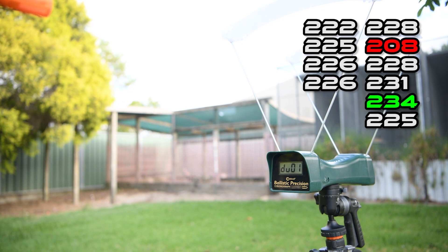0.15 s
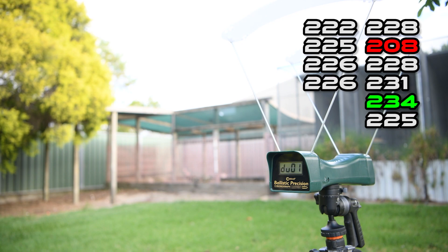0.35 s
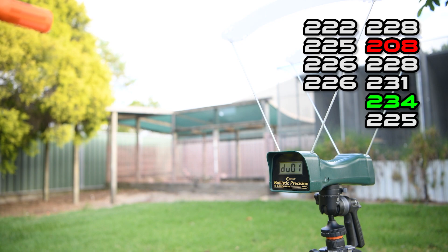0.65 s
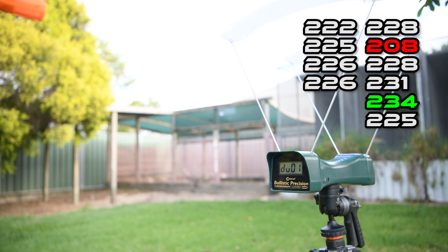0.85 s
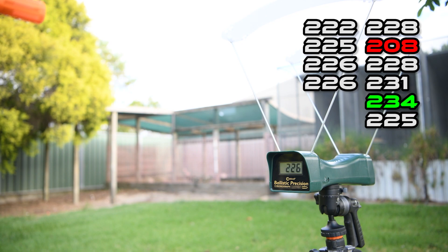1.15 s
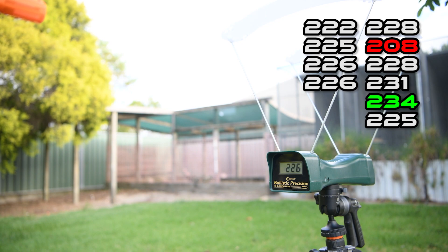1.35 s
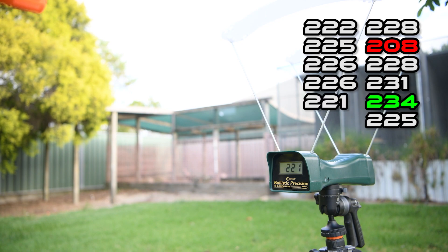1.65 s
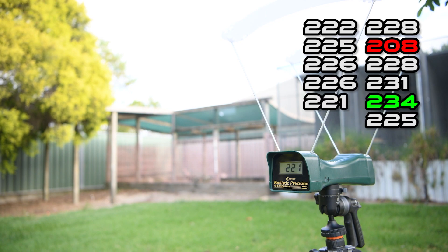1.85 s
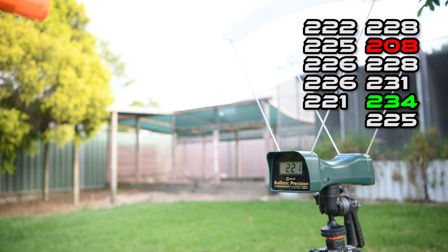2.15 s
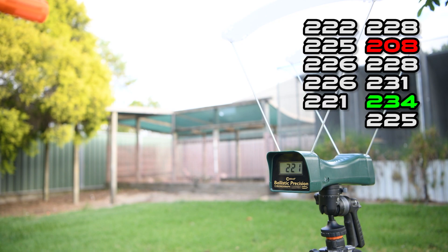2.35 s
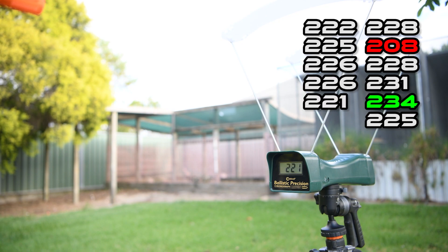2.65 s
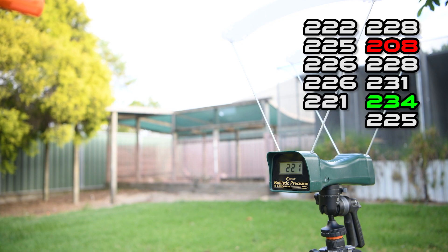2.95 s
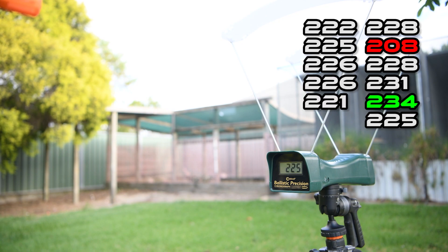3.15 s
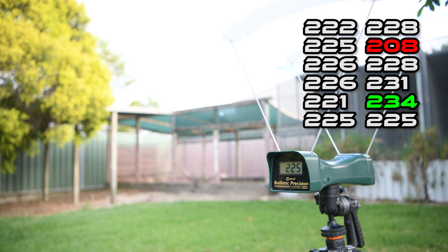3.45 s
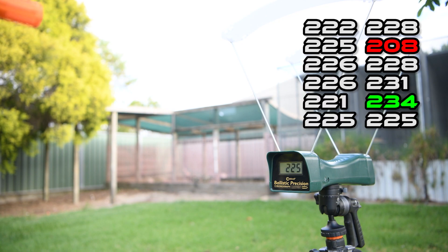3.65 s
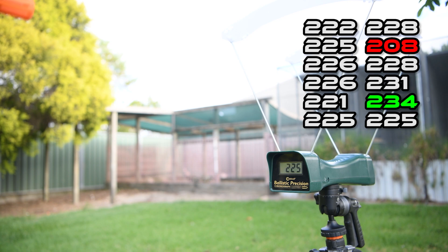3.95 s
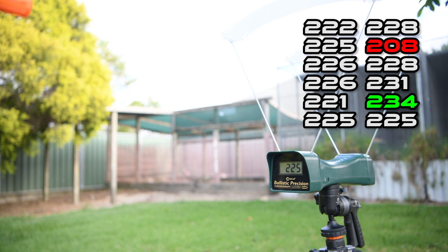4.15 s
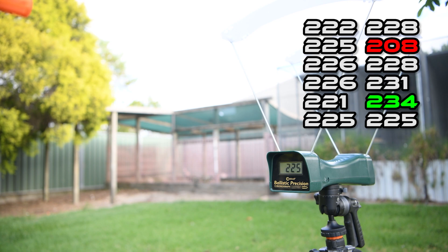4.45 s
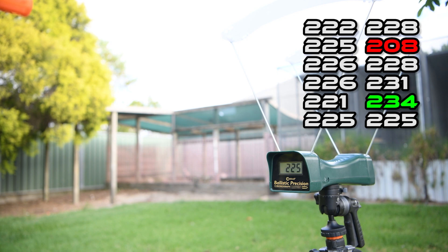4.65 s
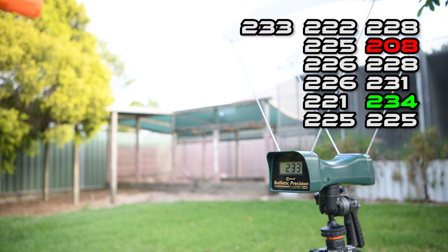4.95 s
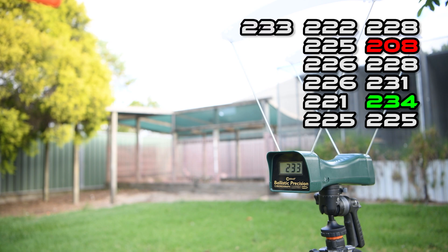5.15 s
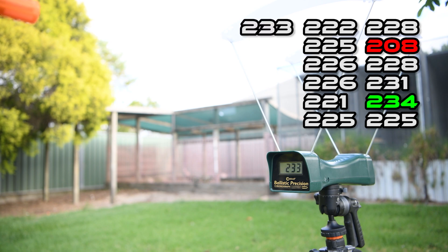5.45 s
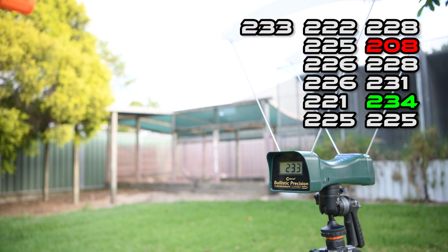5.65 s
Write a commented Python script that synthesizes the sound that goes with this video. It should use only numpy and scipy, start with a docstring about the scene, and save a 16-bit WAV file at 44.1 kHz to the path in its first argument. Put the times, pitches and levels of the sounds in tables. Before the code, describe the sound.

A spring-powered toy dart blaster is fired and re-primed four times outdoors, with sharp cracks, plastic scraping and hard clacks, and faint wind.

```python
"""Fenced garden, stereo microphone close by, a spring dart blaster just to its left, fired and primed four times.
Each shot is a noise crack, a sine thump and a barrel hum, with a rattling shell. Then the slide scrapes back
and forward among knocks: rough slips and blows drive shell resonances and bands of hiss.
Low noise puffs of wind hit mostly the right port over shaped noise of far traffic and a narrow far drone.
A small bird chirps in gliding sines; blaster and bird return scattered noise echoes from fences and sheds."""
import sys
import numpy as np
from scipy import signal
from scipy.fft import rfft, irfft
from scipy.io import wavfile
from scipy.ndimage import uniform_filter1d

SR = 44100
rng = np.random.default_rng(int(sys.argv[2]) if len(sys.argv) > 2 else 0)


def generate_wav(sig):
    """Save sig (samples, or channels by samples) to the path in sys.argv[1] as 16-bit PCM at SR."""
    pcm = np.round(np.clip(np.atleast_2d(sig).T, -1, 1) * 32767).astype(np.int16)
    wavfile.write(sys.argv[1], SR, pcm)


N = 255780
T = np.arange(N) / SR


def undb(db):
    """Gain of a level in dB."""
    return 10 ** (np.asarray(db) / 20)


def ring(x, hz, width_hz):
    """One resonance, gain 1 at its centre."""
    return signal.lfilter(*signal.iirpeak(hz, hz / width_hz, fs=SR), x)


def unit(x):
    """Scaled to rms 1."""
    return x / np.sqrt(np.mean(x ** 2))


def add(track, s, x):
    """Mixes x into the track from time s on."""
    i = int(s * SR)
    track[..., i:i + x.shape[-1]] += x[..., :N - i]


def grit(scatter_db, alike, ticks_hz, tick_db):
    """Dense tiny slips of uneven size with sparse harder ticks, one row per port, partly shared."""
    slips = rng.standard_normal((2, N)) * undb(scatter_db * rng.exponential(size=(2, N)))
    right = alike * slips[0] + np.sqrt(1 - alike ** 2) * slips[1]
    hits = (rng.random(N) < ticks_hz / SR) * undb(tick_db + rng.standard_normal(N))
    catch = 1 + signal.lfilter([1], [1, -.97], hits)  # a tick lasts about a millisecond
    return unit(catch * np.array([slips[0], right]))


def flutter(rate, depth_db):
    """Gain that wavers at random about rate times a second."""
    k = int(SR / rate)
    steps = np.repeat(rng.standard_normal(N // k + 1), k)
    return undb(depth_db * uniform_filter1d(steps, k)[:N])


# gusts, followed fully on the right port and weakly on the left: start_s, level_db
GUST_LEVELS = [(0.0, -39.5), (0.37, -54), (0.71, -55), (0.76, -36.5), (0.89, -42), (1.05, -53), (1.42, -41),
               (1.99, -64.5), (2.05, -41), (2.31, -65), (3.0, -35), (3.21, -39.5), (3.41, -30), (3.46, -37),
               (4.41, -65.5), (4.81, -54), (4.85, -36), (4.88, -39), (5.17, -42), (5.72, -59), (5.75, -45),
               (5.8, -70)]
# single strong pushes on the right port: start_s, relative level_db, relative pitch_hz
WIND_BUFFETS = [(0.777, -51, 91), (0.819, -39, 87), (0.857, -38, 74), (0.89, -31.5, 113), (0.918, -37, 95),
                (0.981, -40, 140), (1.145, -46.5, 126), (1.418, -33, 106), (2.65, -37.5, 74.5),
                (2.699, -44, 144), (2.78, -29.5, 137), (2.808, -39, 72.7), (2.829, -31, 137),
                (2.878, -46, 150), (2.915, -32, 139), (2.936, -29, 87), (2.961, -44, 159),
                (3.001, -40, 75.4), (3.039, -41, 88), (3.389, -32, 98), (4.687, -42, 158), (5.747, -40, 81)]


def wind():
    """Eddies hit each port alone as short low puffs; the strongest come as single steep pushes."""
    s, db = np.transpose(GUST_LEVELS)
    gust_db = np.interp(T, s, db)
    puffs = (rng.random((2, N)) < 250 / SR) * rng.standard_normal((2, N))
    puffs = puffs * undb(1.5 * rng.exponential(size=(2, N)))  # uneven puff sizes
    low = puffs + 0.045 * rng.standard_normal((2, N))
    for hz, width_hz in [(79, 160), (112, 137), (67, 130)]:
        low = ring(low, hz, width_hz)
    low = unit(low)
    left = undb(0.38 * gust_db - 43.5) * low[0]
    right = flutter(13, 2.5) * undb(gust_db) * low[1]
    t = T[:SR // 20]
    for s0, level_db, hz in WIND_BUFFETS:
        cycles = hz * (t - .013)  # centred 13 ms after its start
        envelope = np.exp(-(cycles / 0.28) ** 2)
        add(right, s0, undb(level_db + 7.5) * envelope * np.cos(2 * np.pi * 1.13 * cycles + 0.58))
    return np.array([left, right])


# spectrum of far traffic and microphone hiss: pitch_hz, relative level_db per Hz
GARDEN_SPECTRUM = [(15, -6), (25, 0.5), (138, 3), (197, 0), (313, -17), (368, -18.5), (538, -11.5),
                   (600, -13), (927, -10.5), (2670, -30), (8140, -37.5), (15200, -34), (16500, -37)]
GARDEN_DB = -63  # level of the part common to both ports above 200 Hz, before its slow waver


def garden():
    """Far noise that wavers slightly, alike on both ports in the bass only."""
    hz = np.maximum(np.arange(N // 2 + 1) * SR / N, 1)
    f, db = np.transpose(GARDEN_SPECTRUM)
    gain = undb(np.interp(np.log(hz), np.log(f), db))
    mid, side = rfft(rng.standard_normal((2, N))) * gain
    side = side * np.clip(0.033 + hz / 2500, 0, 1)
    far = irfft(np.array([mid + side, mid - side]), N)
    return far * flutter(3.46, 1.03) * undb(GARDEN_DB) / np.std(irfft(mid * (hz > 200), N))


# shots, all levels relative: start_s, crack level_db, plunger thump level_db, barrel level_db,
# loud part shell level_db, loud part hiss level_db, rattle length_s, rattle shell level_db,
# rattle hiss level_db
SHOT_EVENTS = [(0.01, -22, -23, -24.5, -25, -28.5, 0.086, -34, -32),
               (1.506, -20, -17.5, -26, -24.5, -26.5, 0.11, -35.5, -31),
               (3.1048, -20, -22.5, -39.5, -24, -28, 0.13, -32.5, -34.5),
               (4.8282, -20, -13.5, -38.5, -25, -28, 0.11, -31, -32.5)]
PLUNGER_S = .012  # from the catch letting go to the plunger landing
BARREL_HZ = 243.8
SNAP_S, SNAP_LATE_S = .0005, .0012  # decay of the catch's bright snap to either side, and its delay
AFTER_SNAP_DB, LANDING_DB = -8, -6  # noise after the snap, and the snap again at the plunger


def shots():
    """Catch cracks, the plunger lands a moment later, and the air column of the barrel hums on."""
    out, t = np.zeros((2, N)), T[:SR // 5]

    def snap(at):
        return np.exp(-np.abs(t - at) / SNAP_S)

    after_snap = undb(AFTER_SNAP_DB) * (t < .016) * np.minimum(t / SNAP_LATE_S, 1)
    landing = undb(LANDING_DB) * snap(SNAP_LATE_S + PLUNGER_S)
    crack_shape = snap(SNAP_LATE_S) + after_snap + landing
    barrel_swell = np.clip(t / 0.0071, 0, 1) * np.clip((.085 - t) / 0.037, 0, 1)
    for s, crack_db, thump_db, barrel_db, *_ in SHOT_EVENTS:
        crack = signal.lfilter([1], [1, 0.15], rng.standard_normal(len(t))) * crack_shape
        add(out, s, crack * undb(crack_db - 60 * t / 0.24) * undb([[2.5], [-2.5]]))
        thump = np.sin(2 * np.pi * 110 * t) * np.minimum(t / 0.0022, 1)
        add(out, s + PLUNGER_S, undb(thump_db - 60 * t / 0.027) * thump)
        waver = np.cumsum(uniform_filter1d(rng.standard_normal(len(t)), 200)) * .012
        hum = np.sin(2 * np.pi * BARREL_HZ * t + waver)
        add(out, s + 0.0202, undb(barrel_db) * barrel_swell * hum)
    return out


# slide strokes, back then forward: start_s, length_s, rise_s, relative shell level_db,
# relative hiss level_db, swell_db along the stroke (up or down)
SLIDE_STROKES = [(0.369, 0.11, 0.029, -35.5, -32.5, 2.5), (0.629, 0.084, 0.033, -36.5, -35, -0.5),
                 (1.881, 0.1, 0.03, -33, -32, 2), (2.153, 0.088, 0.022, -38, -38.5, 6),
                 (3.363, 0.12, 0.051, -37, -33, 1), (3.658, 0.091, 0.028, -35, -35.5, -1),
                 (5.082, 0.086, 0.037, -43, -33.5, -1.5), (5.353, 0.11, 0.032, -37, -35.5, 2)]
# letting go, one row for shell, one for hiss: quick fall_db_per_s, lingering shake_db, its fall_db_per_s
RELEASE = [(450, -12, 79), (540, -13.5, 116)]
# the rattle's own quick fall, slower than a stroke's: shell, hiss, both fall_db_per_s
RATTLE_FALL = [150, 249]
LOUD_PART_S = 0.1088  # the shot's loud first part lasts this long, then the level steps down
SHELL_SAG_DB_S, HISS_SAG_DB_S = 80, 62  # fall during the loud part
RECOVERY_S = 0.057  # the shell level recovers over this time as the rattle goes on


def strokes():
    """Push on shell (row 0) and hiss (row 1): shots sag and step down; rattles and strokes rise, then fall away."""
    push, t = np.zeros((2, N)), T[:SR]
    slide_fall, linger_db, linger_fall = np.transpose(RELEASE)[:, :, None]
    sag = np.array([[SHELL_SAG_DB_S], [HISS_SAG_DB_S]])

    def motion(length, rise, db, drift_db, fall):
        after = np.maximum(t - length, 0)
        quick = (1 - undb(linger_db)) * undb(-fall * after)
        lingering = undb(linger_db - linger_fall * after)
        # the swell, up or down, is greatest at 0.9 of the length
        drift = np.interp(t / length, [0, 0.9, 1], [0, drift_db, 0])
        level = undb(np.reshape(db, (2, 1)) + drift)
        return np.minimum(t / rise, 1) ** 0.83 * level * (quick + lingering)

    for s, *_, shell_db, hiss_db, length, rattle_db, fizz_db in SHOT_EVENTS:
        landed = s + PLUNGER_S
        add(push, landed, undb([[shell_db], [hiss_db]] - sag * t) * (t < LOUD_PART_S))
        rise = np.array([[RECOVERY_S], [.002]])
        rattle = motion(length, rise, [rattle_db, fizz_db], 0, np.c_[RATTLE_FALL])
        add(push, landed + LOUD_PART_S, rattle)
    for s, length, rise, shell_db, hiss_db, swell_db in SLIDE_STROKES:
        add(push, s, motion(length, rise, [shell_db, hiss_db], swell_db, slide_fall))
    return uniform_filter1d(push, size=150)


# knocks of catch and slide: start_s, relative level_db, strongest ring pitch_hz,
# treble level_db relative to the knock, decay t60_s
KNOCK_EVENTS = [(0.244, -29, 730, -17, 0.054), (0.337, -31, 750, -28, 0.047), (0.358, -28, 880, -14, 0.045),
                (0.505, -32, 1090, -28, 0.065), (0.572, -23, 680, -5.5, 0.22),
                (0.592, -25, 1200, -18, 0.047), (0.609, -25, 1180, -5, 0.039),
                (0.694, -28, 1490, -5, 0.085), (0.708, -16, 800, -25, 0.085), (0.768, -42, 635, -4, 0.043),
                (1.758, -49, 1070, 0, 0.13), (1.834, -27, 1600, -3, 0.035), (1.861, -25, 950, -18, 0.045),
                (2.03, -33.5, 1330, -14, 0.042), (2.098, -24.5, 676, -5, 0.15),
                (2.107, -18, 1100, -17, 0.045), (2.138, -26, 1250, -12, 0.045),
                (2.229, -26, 980, -10, 0.077), (2.243, -15.5, 990, -20, 0.046),
                (2.291, -37, 2100, -11, 0.027), (3.347, -31.5, 740, 7, 0.1), (3.473, -21.5, 592, -4, 0.046),
                (3.542, -32.5, 1380, -13, 0.082), (3.594, -19.5, 694, -6, 0.11),
                (3.603, -33, 1400, -10, 0.027), (3.628, -34, 1360, -8, 0.073), (3.641, -28, 684, -3, 0.04),
                (3.724, -20, 1160, -14, 0.064), (3.737, -14.5, 795, -25, 0.091),
                (5.138, -21.5, 700, -14.5, 0.05), (5.275, -25.5, 705, -5.5, 0.11),
                (5.292, -18, 1235, -6, 0.031), (5.322, -35, 670, -5, 0.056), (5.337, -23.5, 690, -7, 0.061),
                (5.43, -26.5, 890, -15, 0.051), (5.447, -17, 990, -16, 0.07),
                (5.504, -38, 2450, -11, 0.064)]
KICK_S = .0006  # the first hard contact
KNOCK_RISE = 0.054  # share of its decay time that a knock takes to build up
KNOCK_BEND = 1.134  # a knock chatters a moment, then stops short


def knocks(mode_hz):
    """Blows and first kicks on each shell mode, favouring those near the knock's pitch, and push on the hiss."""
    blows, kicks = np.zeros((2, len(mode_hz), N))
    hiss_push = np.zeros(N)
    t = T[:SR // 5]
    kick = np.sin(np.pi * np.minimum(t / KICK_S, 1))
    for s0, db, hz, treble_db, t60 in KNOCK_EVENTS:
        fade = np.minimum(t / 0.0022, 1) * undb(db - 7.0 - 60 * (t / t60) ** KNOCK_BEND)
        favour_db = -7.5 * np.abs(np.log2(mode_hz / hz))  # 7.5 dB less per octave away
        build_up = np.minimum(t / (KNOCK_RISE * t60), 1)
        add(blows, s0, undb(favour_db + 6.5)[:, None] * fade * build_up)
        add(kicks, s0, undb(favour_db + db)[:, None] * kick)
        add(hiss_push, s0, undb(treble_db) * fade * (undb(-25 * t / t60) + 0.99 * np.exp(-t / 0.0014)))
    return blows, kicks, hiss_push


# modes of the plastic shell: pitch_hz, width_hz, relative level_db
SHELL_MODES = [(299, 134, 5.5), (711, 216, 13), (981, 81, 14), (1155, 340, 11), (1490, 61, 7.5),
               (2006, 135, 11.5), (2284, 900, 5), (3000, 1200, -2), (1670, 2750, 10.5)]


def shell(push, blows, kicks):
    """Slips and knocks excite the modes; the grip shifts, so each mode swells on its own."""
    modes = np.array(SHELL_MODES, float)
    slips = grit(1.5, alike=.99, ticks_hz=120, tick_db=5)
    loose = grit(1.5, alike=.5, ticks_hz=120, tick_db=4)
    shake = flutter(70, 1.5)
    norm = np.sqrt(np.sum(undb(modes[:, 2]) ** 2 * modes[:, 1]) * np.pi / SR)
    sound = np.zeros((2, N))
    for k, (hz, width_hz, db) in enumerate(modes):
        rub = slips if hz < 1300 else loose  # high modes radiate unevenly towards the two ports
        force = rub * (push * shake * flutter(40, 4.0) + blows[k]) + kicks[k]
        sound += (-1) ** k * undb(db) * ring(force, hz, width_hz)
    walls = signal.butter(2, 4300, fs=SR, output="sos")  # thick walls carry little treble
    return signal.sosfilt(walls, sound / norm)


# colour of the scraping hiss: pitch_hz, width_hz, relative level_db
HISS_BANDS = [(4040, 8000, -1.5), (6840, 480, 0.5), (7750, 7200, -4.5), (10200, 15500, -13.5),
              (13530, 9700, -6), (15470, 1700, 5.5)]


def hiss():
    """Scraping grit in bands, each from another spot of the slide, so the bands do not cancel."""
    scrape = grit(2.0, alike=.35, ticks_hz=150, tick_db=5)
    sound = np.zeros((2, N))
    for hz, width_hz, db in HISS_BANDS:
        spot = scrape * rng.choice([-1, 1], N)
        sound += undb(db) * flutter(14, 4.7) * ring(spot, hz, width_hz)
    return unit(sound)


def blaster():
    """Shots, strokes and knocks together drive the shell and the hiss, both stronger at the left port."""
    shell_push, hiss_push = strokes()
    blows, kicks, knock_hiss = knocks(np.array(SHELL_MODES, float)[:, 0])
    hiss_push = hiss_push * flutter(90, 1.0) + knock_hiss
    body = shell(shell_push, blows, kicks)
    return body * undb([[1.9], [.4]]) + hiss() * hiss_push * undb([[4.5], [.6]])


# thin bright ticks of trigger and grip: start_s, relative level_db, t60_s, lowest treble pitch_hz
TICK_EVENTS = [(0.132, -39, .02, 9000), (1.179, -53.5, .02, 5000), (1.48, -46, 0.2, 2900),
               (1.63, -31, .02, 9000), (2.349, -47, .02, 6000), (2.707, -55, 0.027, 4000),
               (2.879, -42.5, 0.02, 2500), (3.067, -54, 0.3, 4000), (3.227, -35, 0.016, 9000),
               (3.828, -34, .025, 11000), (3.931, -45, 0.018, 7000), (3.965, -52, .02, 5000),
               (4.587, -60, .03, 8000), (4.765, -55.5, 0.099, 4000), (4.809, -51, 0.25, 4000),
               (5.535, -52, .02, 7000), (5.557, -38, .02, 11000), (5.722, -64, .05, 9100)]


def ticks():
    """Tiny bursts of high-passed noise, partly shared by the ports."""
    out, t = np.zeros((2, N)), T[:SR // 10]
    for s, db, t60, low_hz in TICK_EVENTS:
        burst = rng.standard_normal(len(t)) + 0.91 * rng.standard_normal((2, len(t)))
        treble = signal.butter(2, low_hz, "high", fs=SR, output="sos")
        burst = unit(signal.sosfilt(treble, burst))
        fade = np.minimum(t / .0005, 1) * undb(db - 60 * t / t60)
        add(out, s, burst * fade * undb([[2.0], [-2.0]]))
    return out


# dull jolts of the stock: start_s, pitch_hz, relative level_db, t60_s before a closing fade
STOCK_JOLTS = [(0.139, 107, -48, 0.52), (0.45, 88, -36, 0.051), (1.65, 112, -43.5, 0.43),
               (1.97, 90, -43, 0.11), (3.297, 119, -39.5, 1), (5.152, 71, -36, .08)]


def jolts():
    """Low decaying sines of the stock, nearer the left port."""
    out, t = np.zeros((2, N)), T[:SR // 5]
    closing = np.hanning(2 * len(t))[len(t):]
    for s, hz, db, t60 in STOCK_JOLTS:
        jolt = np.minimum(t / 0.0028, 1) * undb(db - 60 * t / t60) * np.sin(2 * np.pi * hz * t)
        add(out, s, jolt * closing * undb([[3.0], [-6.0]]))
    return out


# chirps, one list of points for each: start_s, pitch_hz, relative level_db
BIRD_CHIRPS = [
    [(1.258, 5420, -74), (1.275, 6300, -58.5), (1.293, 7260, -53.5), (1.302, 6900, -57), (1.312, 6200, -66),
     (1.32, 5800, -85)],
    [(4.2, 4000, -84), (4.23, 4140, -85), (4.28, 4350, -86)],
    [(4.42, 3650, -86), (4.48, 3750, -84), (4.55, 3820, -89)],
]


def bird():
    """Gliding whistles, the first arched, with a weaker second voice above."""
    song = 0
    for s, hz, db in map(np.transpose, BIRD_CHIRPS):
        phase = 2 * np.pi * np.cumsum(np.interp(T, s, hz)) / SR
        level = undb(np.interp(T, s, db, -200, -200))
        song = song + level * (np.sin(phase) + undb(-12.0) * np.sin(1.1 * phase))
    return song * undb([[-2.0], [6.0]])


# a far drone that comes up: start_s, level_db
DRONE_LEVELS = [(2.3, -85), (2.7, -73), (3.9, -70), (4.4, -67), (5.8, -71)]


def drone():
    """A narrow wavering hum far away: noise through two equal resonances."""
    s, db = np.transpose(DRONE_LEVELS)
    hum = ring(ring(rng.standard_normal(N), 308, 30), 308, 30)
    return undb(np.interp(T, s, db, -200)) * unit(hum)


def fences(x, t60, wet_db):
    """Scattered echoes from fences and sheds, as decaying noise added to the direct sound."""
    t = T[:SR // 2]
    echo = rng.standard_normal((2, len(t))) * undb(-60 * t / t60) * np.minimum(t / 0.0048, 1)
    echo = signal.lfilter([1], [1, -.6], echo)  # duller
    echo = echo + 0.43 * uniform_filter1d(echo[0], size=24)  # long waves arrive alike at both ports
    echo = echo / np.sqrt(np.sum(echo ** 2) / 2)
    return x + undb(wet_db) * signal.fftconvolve(x.mean(axis=0)[None], echo, axes=1)[:, :N]


PORT_LAG = 4  # samples


def scene():
    """The blaster reaches the left port first; wind, garden and drone add no echoes."""
    near = blaster() + shots() + jolts() + ticks()
    near[1] = np.roll(near[1], PORT_LAG)
    return fences(near, 0.14, -22) + fences(bird(), .6, -7.5) + wind() + garden() + drone()


TOP_HZ, EDGE_HZ = 15750, 16950  # where the treble ends: a partial step, then a deep one


def record(dry):
    """Quick gain control evens out loud passages but lets first cracks through; the treble ends in two steps."""
    # the power average takes about 6 ms to respond
    power = signal.lfilter([1 / 260], [1, 1 / 260 - 1], np.mean(dry ** 2, axis=0))
    over_db = np.maximum(10 * np.log10(power + 1e-12) + 35, 0)
    even = .3 * np.tanh(dry * undb(-.4 * over_db) / .3)  # peaks bend softly
    soft = signal.sosfilt(signal.ellip(10, .3, 33, TOP_HZ, fs=SR, output="sos"), even)
    return signal.sosfilt(signal.ellip(10, .3, 70, EDGE_HZ, fs=SR, output="sos"), soft)


dry = scene()
out = record(dry)
generate_wav(out)
```